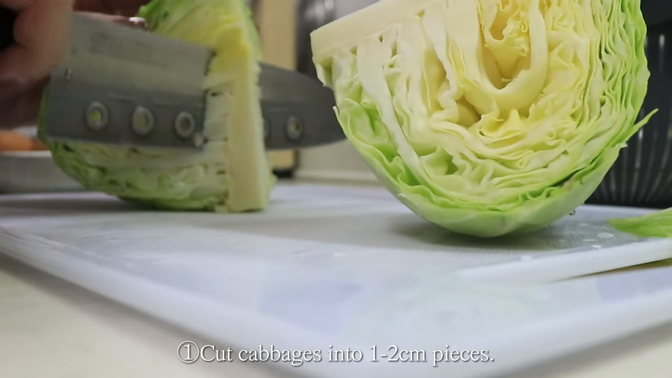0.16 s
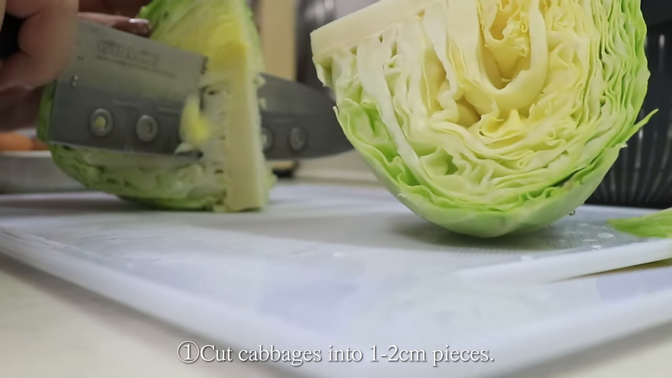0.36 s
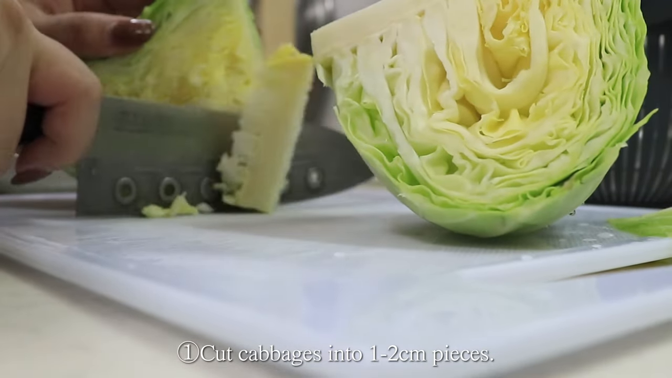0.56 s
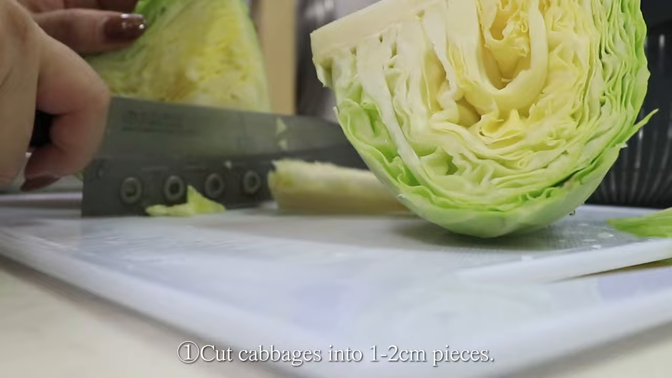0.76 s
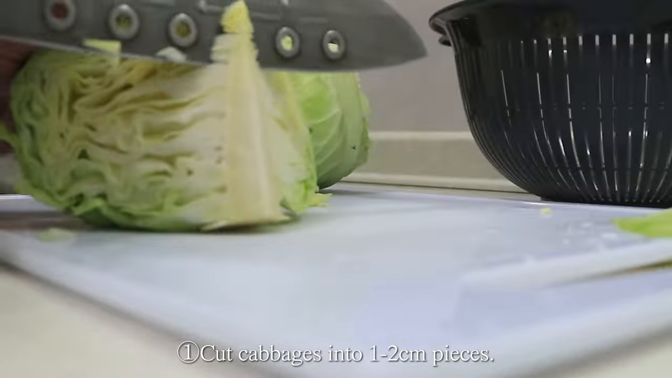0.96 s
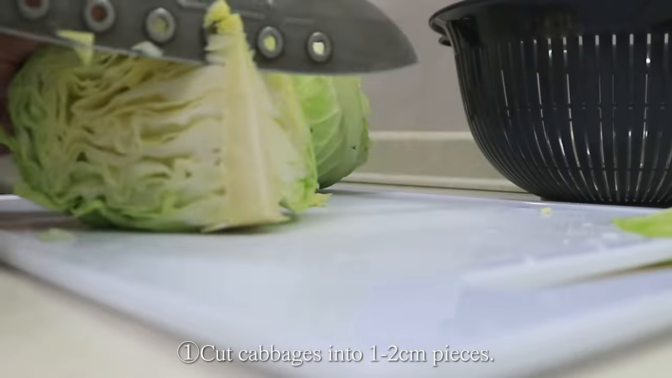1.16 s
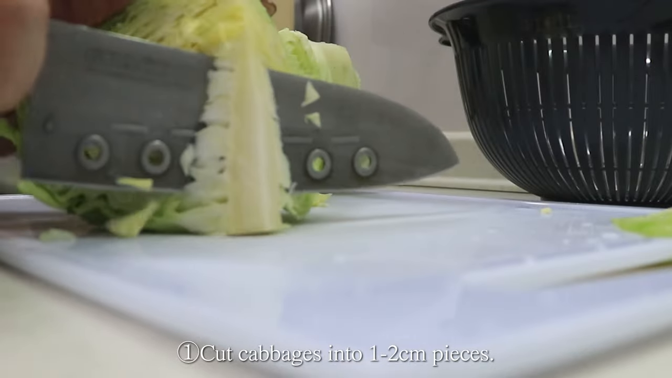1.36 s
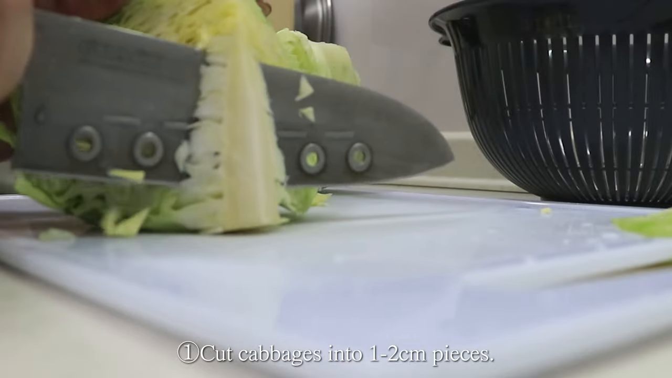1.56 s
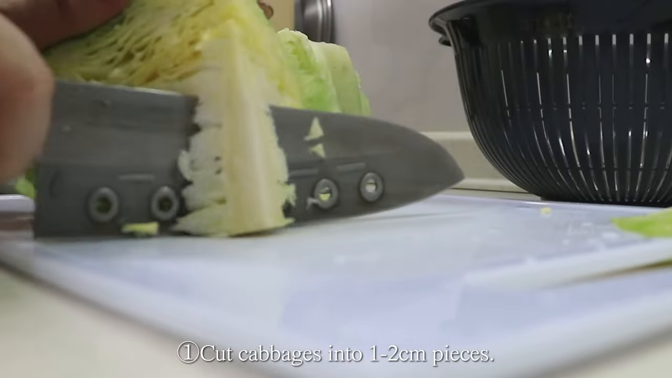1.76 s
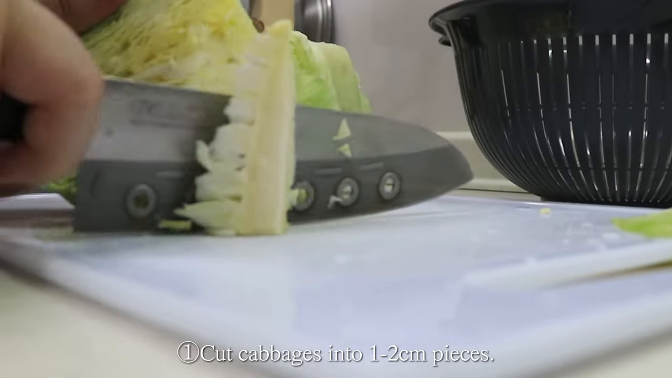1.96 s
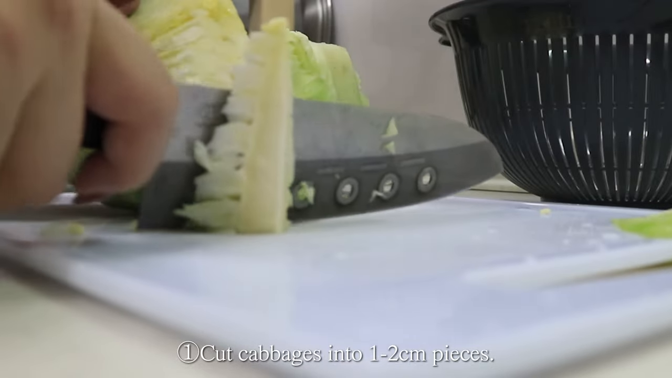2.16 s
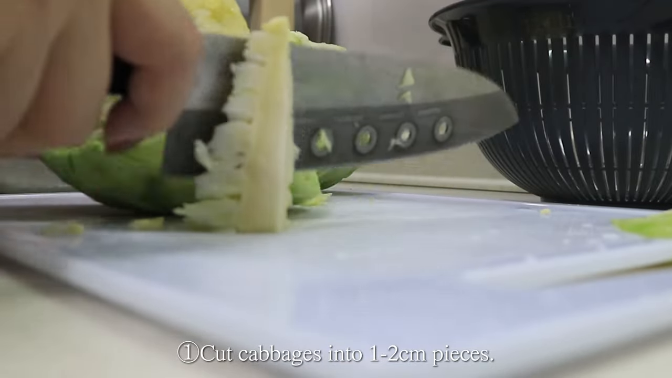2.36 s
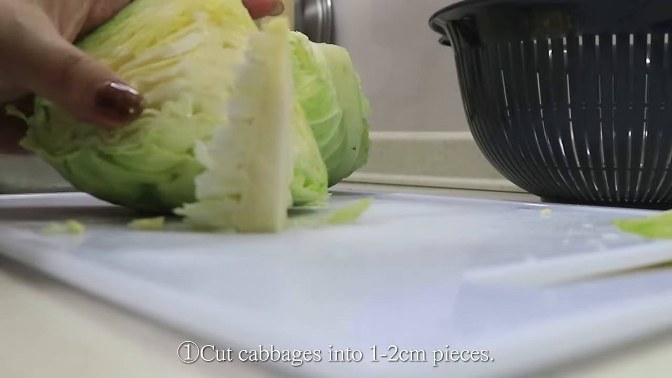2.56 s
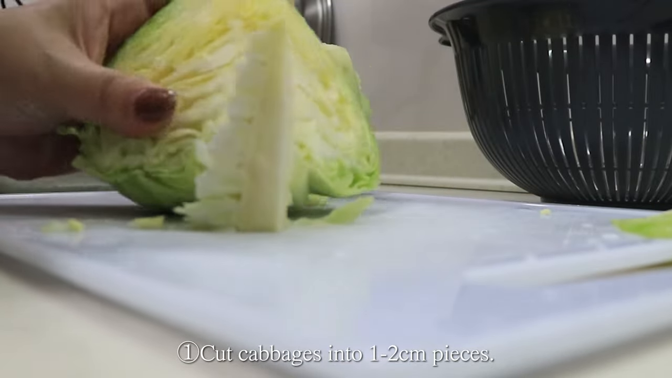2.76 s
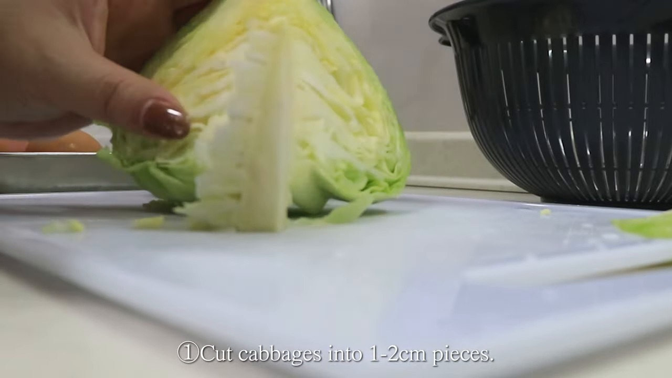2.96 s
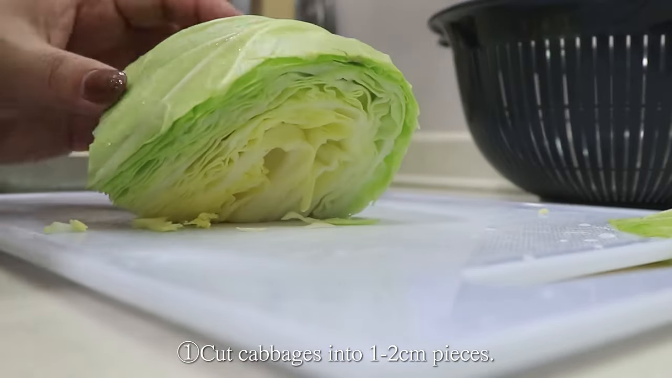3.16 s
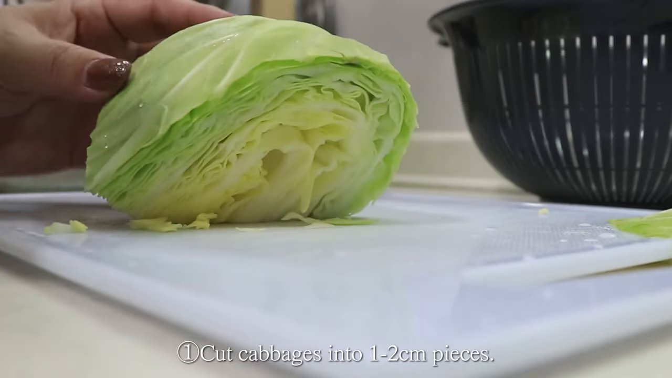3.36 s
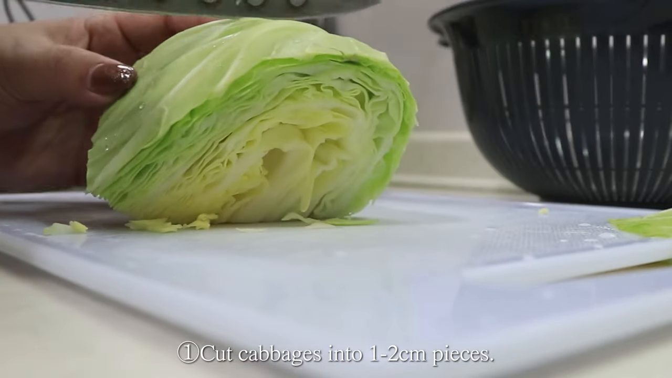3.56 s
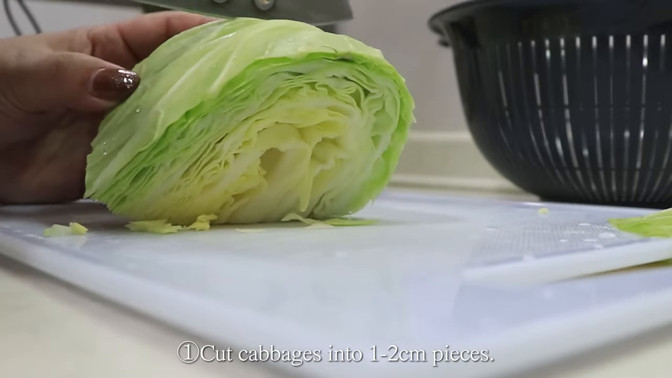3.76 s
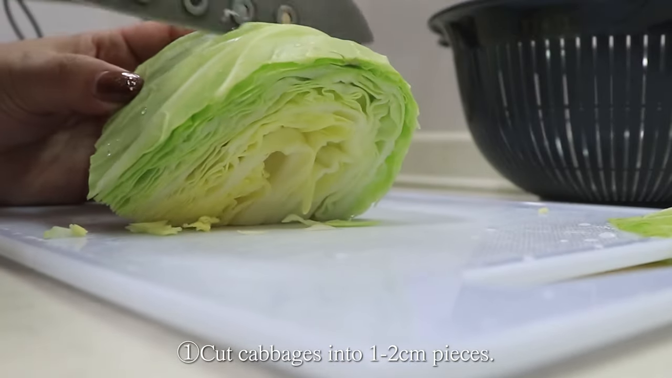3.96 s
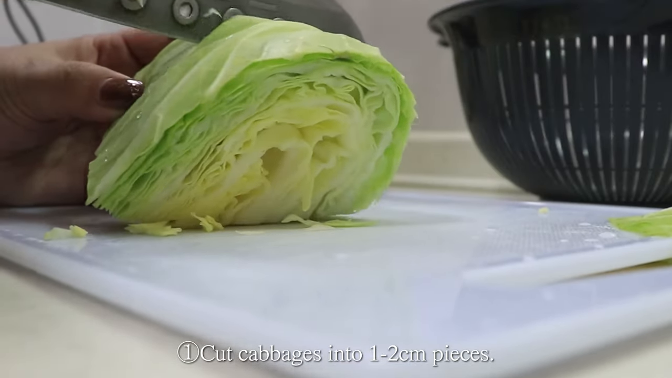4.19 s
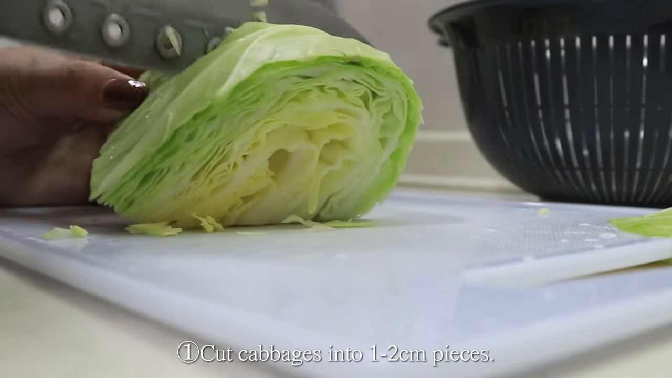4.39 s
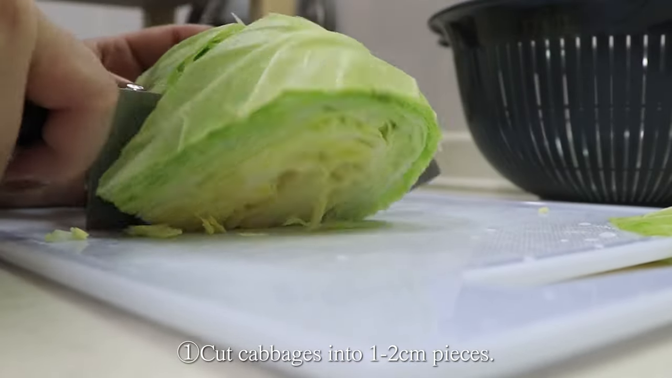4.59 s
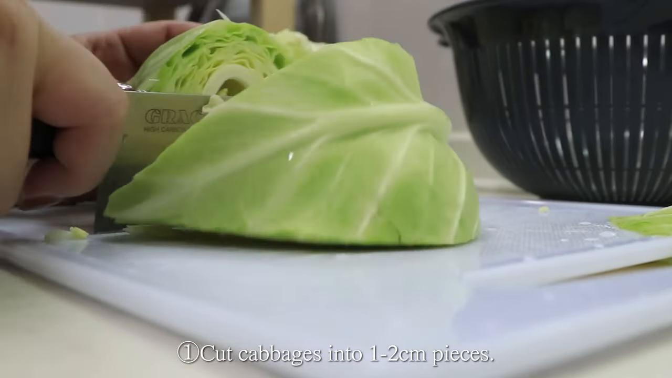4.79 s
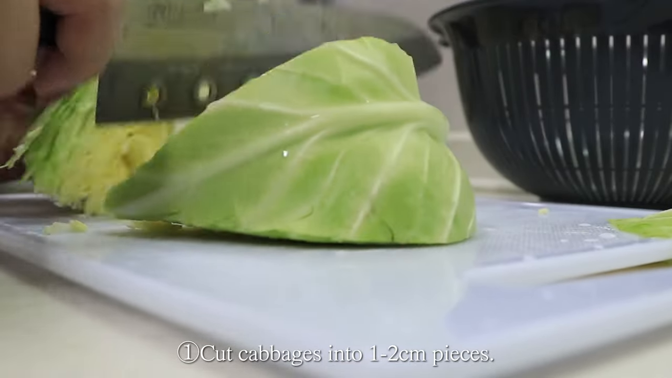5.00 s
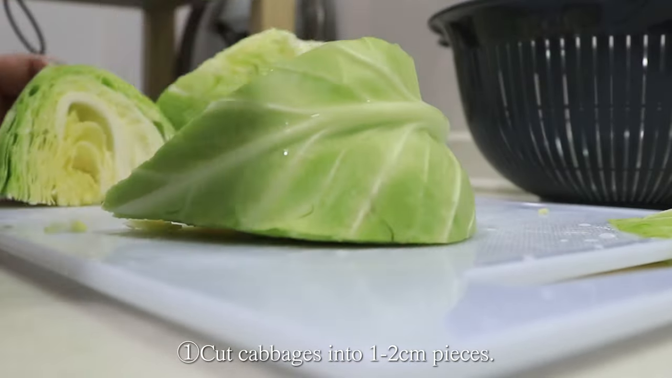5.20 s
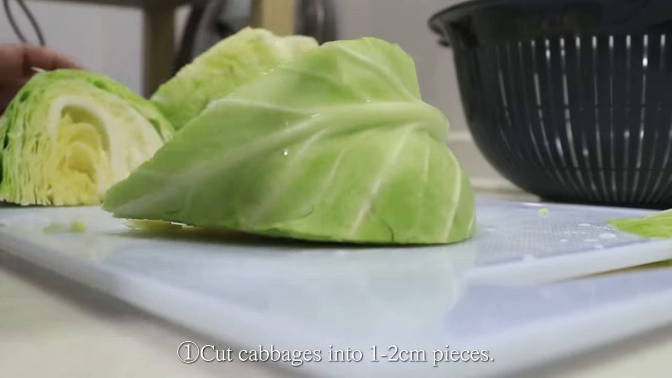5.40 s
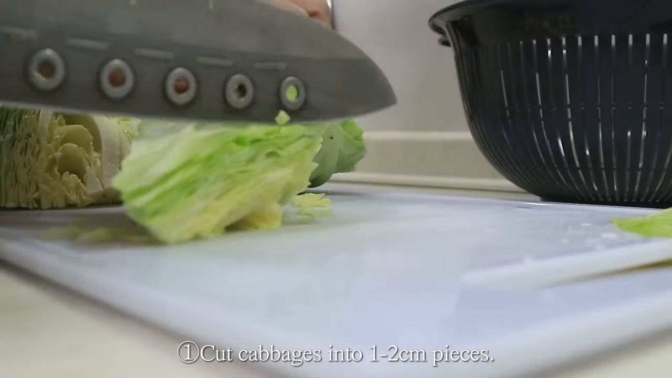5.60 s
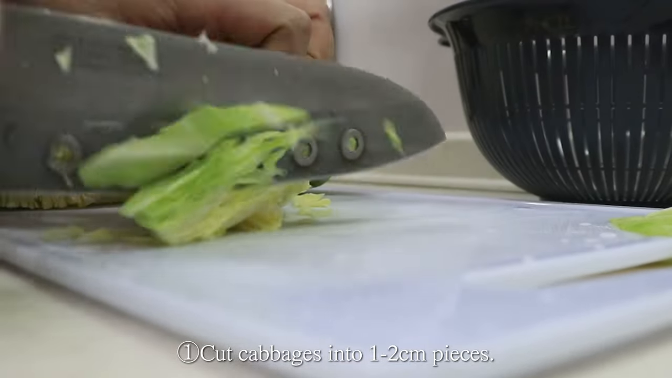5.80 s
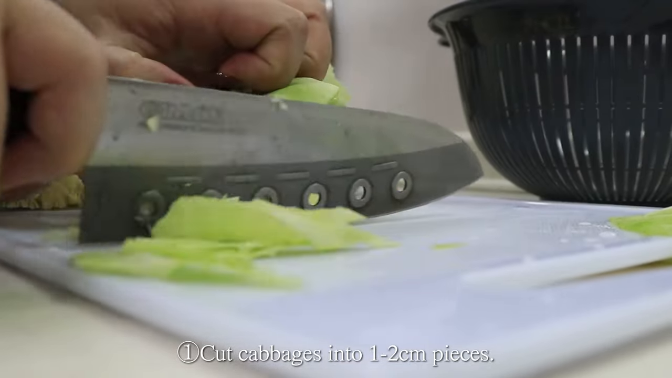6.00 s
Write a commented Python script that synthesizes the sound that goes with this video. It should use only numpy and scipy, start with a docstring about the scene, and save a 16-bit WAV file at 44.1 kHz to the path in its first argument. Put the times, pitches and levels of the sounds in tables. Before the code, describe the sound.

Close, dry sound of a knife cutting firm cabbage on a plastic board in a small kitchen, over faint low rumble and hiss. A crisp, splintering crunch at 0.1-0.3 s, scattered snaps, then a short hard crunch at 0.6 with a resonant board knock; a lighter knock at 0.83. Around 0.9-1.05 the blade pulls back through crackling leaf with bright snaps, followed by a tiny creaking judder near 1.16. Loud crunches at 1.3 and 1.8, the latter with a ringing knock. From 2 to 3.9, mostly quiet rustles, vein ticks, small snaps and soft pats. At 4.0-4.3, tentative crackles and wet squeaks; at 4.4 a big hollow crunch, squeak, and hard knock at 4.64. Leaves flop and rustle at 4.8-5.5. A last bright crunch starts at 5.76, its deeper body growing, and ends with a knock at 5.99. The loudest crunches slightly distort.

```python
"""A kitchen knife cuts cabbage on a plastic board, very close: each stroke is a swarm of leaf fractures.
Ribs snap as tuned noise bursts; the blade knocks on the board's modes, squeaks as wavering tones,
judders once in stick-slip jerks and is drawn back out through crackling leaf.
Between strokes a hand shifts rustling leaves (fractures and vein ticks) and cut pieces flop down.
Counter swings, a small room, low rumble and hiss lie around it; the loudest crunches overload."""
import sys
import numpy as np
from scipy import signal
from scipy.io import wavfile
from scipy.ndimage import uniform_filter1d

SR = 44100
rng = np.random.default_rng(int(sys.argv[2]) if len(sys.argv) > 2 else 0)


def inscribe(sig):
    """Save sig as 16-bit PCM at rate SR to the path in sys.argv[1].

    A 1-D sig is mono; a 2-D sig holds one channel per row.
    Samples are clipped to [-1, 1] before scaling.
    """
    pcm = np.round(np.clip(np.atleast_2d(sig).T, -1, 1) * 32767)
    wavfile.write(sys.argv[1], SR, pcm.astype(np.int16))


N = 266364

# Levels and spectra in dB are relative.
# cutting strokes: start_s, length_s, bite_s, crisp_db, hollow_db, head_db,
# deep_swell_db (change over the stroke, hollow and head), opening_db (crackle left as the cut opens)
STROKES = [(0.126, 0.17, 0.05, -7.5, -12.5, -17.5, -1.5, -13),
           (.579, 0.056, 0.013, -5, -10.5, -19, 3.5, -14),
           (1.313, 0.13, 0.0089, -8, -14, -20.5, -1.5, -13.5),
           (1.78, 0.047, 0.017, -1.5, -14.5, -33, 12.5, -15),
           (4, 0.13, .016, -18.5, -22.5, -35.5, 5.5, -4.5),
           (4.208, 0.047, 0.01, -26.5, -23.5, -52, -11.5, -15.5),
           (4.262, 0.018, 0.0039, -22, -12.5, -19.5, -14.5, -17.5),
           (4.401, 0.25, 0.042, -8, -11.5, -21, -11.5, -18.5),
           (5.759, 0.22, 0.038, -10, -25.5, -33.5, 17, -22.5)]
# leaves brushed by hand or blade: firmest_s, rise_s, fall_s, crisp_db, body_db, tick_share (0-1)
RUSTLES = [(0.526, .008, .05, -54.5, -56, 0.8), (.865, 0.15, 0.083, -33.5, -37, 0.7),
           (1.099, 0.3, 0.24, -43, -48, 0.46), (1.18, 0.052, 0.034, -32, -45.5, .05),
           (1.661, 0.28, .18, -47, -72, .7), (2.01, 0.16, 0.19, -30, -32, .55),
           (2.11, 0.068, 0.041, -29, -35, .55), (2.193, 0.038, 0.083, -40.5, -45.5, 0.6),
           (2.761, 0.061, 0.069, -30.5, -39, 0.82), (2.92, 0.049, 0.11, -47, -51, 0.33),
           (3.07, 0.035, .08, -53, -60, 0.67), (3.36, 0.067, 0.036, -47.5, -50, 0.6),
           (3.515, 0.024, 0.051, -27.5, -39.5, 0), (3.692, 0.018, 0.097, -37.5, -43, 0.1),
           (3.844, 0.047, 0.058, -41.5, -56.5, 0.76), (4.814, 0.019, 0.024, -18, -26, .5),
           (4.865, 0.22, 0.06, -37.5, -37, 0.5), (4.929, 0.1, .11, -28.5, -33.5, .4),
           (5.135, 0.027, 0.024, -32, -41, .3), (5.176, 0.062, 0.047, -28, -38, 0.06),
           (5.206, 0.012, 0.076, -19.5, -29.5, 0), (5.313, 0.027, 0.1, -34, -42, 0.7),
           (5.46, 0.031, 0.068, -33.5, -51, 0.6)]
# single ribs snapping: start_s, level_db, centre_hz
RIB_SNAPS = [(0.043, -23, 5700), (0.0875, -33, 5500), (0.1392, -13, 7430), (0.154, -10, 5055),
             (0.165, -4, 7160), (0.2053, -2, 7420), (0.3445, -10, 5250), (0.4015, -18, 5970),
             (0.463, -29, 6210), (0.8804, -12, 3010), (0.8992, -7, 7200), (0.9413, 1, 6270),
             (1.0096, -1, 7480), (1.0462, -15, 5930), (1.0962, -12.5, 6250), (1.3114, -12.5, 7000),
             (1.3232, 0, 7330), (1.331, -10, 6870), (1.4637, 2.5, 5950), (1.631, -20, 6700),
             (1.6456, -14.5, 5960), (1.7025, -15, 4910), (1.7533, -24.5, 5670), (1.7903, -11, 4684),
             (1.802, 3, 6980), (1.9899, -1.5, 6860), (2.0147, -2.5, 2810), (2.0648, -9, 5540),
             (2.2353, -27.5, 5050), (2.7227, -18.5, 6250), (2.7327, -16, 6610), (2.7372, -18, 5130),
             (2.7506, -8.5, 6700), (2.7543, -19, 4330), (2.7692, -9, 3110), (2.904, -18.5, 6900),
             (2.9517, -26, 2880), (3.0555, -33.5, 5080), (3.0832, -25.5, 7000), (3.2964, -29, 7100),
             (3.691, -12.5, 6510), (3.8372, -30.5, 5420), (3.987, -25.5, 7320), (4.0767, -0.5, 7150),
             (4.321, -9, 3000), (4.3844, -16.5, 2740), (4.4396, -6, 3180), (4.4614, -3, 3250),
             (4.7921, -6, 6830), (4.805, -8.5, 2720), (4.8605, -11, 7140), (4.9262, -7.5, 4970),
             (4.9964, -21.5, 4700), (5.1315, -11, 6170), (5.1746, -9, 6050), (5.2535, -15.5, 7000),
             (5.479, -23.5, 4370), (5.7765, -21, 5230), (5.8048, -12, 4920), (5.8156, -7, 5050),
             (5.8296, 0, 7430)]
# blade on board: start_s, blow_db, ring_db, ring_factor (on mode and thud t60), push_db (slow, through the counter)
KNOCKS = [(.632, -6.5, -7, 1.41, -8.5), (.829, -13, -33, .15, -50), (1.835, -7.5, -6.5, 1.57, -14.5),
          (4.642, -1.5, -12.5, 0.89, -35.5), (5.989, -1.5, -5, 0.46, -25)]
# board modes on the counter: mode_hz, level_db, t60_s (before ring_factor)
BOARD_MODES = [(106, -17, 0.4), (176, -7.5, 0.35), (187, -4, 0.41), (270, -10, 0.48), (298, -7.5, 0.36),
               (362.4, -6.5, 0.2), (434, -6.5, 0.21), (546, -9.5, 0.13), (673, -12, 0.32), (1018, -10, .18),
               (1217, -8.5, 0.24), (1415, -14, 0.16), (1650, -13, 0.21)]
# thud spectrum: band_hz, level_db
THUD = [(50, -3.5), (130, -3), (190, 1.5), (600, -2), (1700, -10.5), (2400, -11.5), (5000, -14.5),
        (8500, -13.5), (11000, -18), (16000, -14)]
# thud decay: band_hz, t60_s (before ring_factor)
THUD_DECAY = [(60, .5), (300, 0.2), (1500, 0.38), (6000, 0.27), (14000, 0.037)]
# wet leaf on blade or leaf: start_s, length_s, pitch_hz, rise_share (in mid-squeak), width_hz, level_db
SQUEAKS = [(4.027, .016, 1000, .05, 120, -23), (4.052, .035, 780, .12, 200, -27),
           (4.108, .035, 350, .03, 110, -27), (4.227, .035, 540, .05, 140, -32),
           (4.241, .025, 1950, .5, 50, -23), (4.505, .05, 1380, .08, 130, -17),
           (5.303, .02, 2000, .08, 300, -39)]
# crisp fracture spectrum: band_hz, level_db
CRISP = [(500, -54), (1500, -7.5), (2600, -15.5), (3700, -3), (5000, 3.5), (6200, 4), (7800, 5.5),
         (10000, 1), (12000, 5.5), (16000, -2)]
# packed leaf layers: band_hz, level_db
HOLLOW = [(200, -23.5), (500, -6), (780, -1.5), (1100, 0), (1550, -1), (2000, -4.5), (2750, 1.5),
          (4000, -3.5), (9000, -34.5)]
# whole head on the board: band_hz, level_db
HEAD = [(25, -16), (62, -10.5), (80, 5), (105, 0.5), (135, -6.5), (180, 2), (225, -6.5), (330, 1.5),
        (420, -3.5), (560, 6.5), (900, -15), (2500, -49.5)]
# microphone response: band_hz, gain_db
MICROPHONE = [(20, 0), (8400, 3), (9000, -0.5), (9700, -8), (16000, -13)]
# small room decay: band_hz, t60_s
ROOM_DECAY = [(100, 0.7), (1000, .32), (5000, 0.1), (9000, 0.071), (16000, 0.15)]
# rumble and hiss spectrum: band_hz, level_db
QUIET = [(12, -26), (20, 3), (70, -3.5), (90, -18), (123, -3), (158, -19), (276, -16), (309, -24),
         (336, -16.5), (376, -21), (571, -21), (799, -24), (7260, -37), (15900, -59)]
# blade drawn back out of the cut: start_s, length_s, level_db
DRAW = (0.908, 0.11, -16)
# blade with the cut face clinging to it: band_hz, level_db
BLADE = [(45, -24.5), (63, 15.5), (85, -2), (130, -7), (170, 16), (220, -5.5), (380, -3.5), (520, 8),
         (750, -4.5), (1050, -2.5), (1500, 4), (1900, -6), (2700, 1.5), (3500, -9), (5500, -2.5),
         (8000, 0.5), (16000, -1.5)]
# cabbage rocking under the hand, shaking the counter: start_s, length_s, pitch_hz, level_db
SHAKES = [(0.161, 0.05, 134.2, -27), (0.162, 0.11, 60.44, -26), (4.434, 0.14, 37.9, -20)]
# hard contact with the board: band_hz, level_db
BLOW = [(60, -19), (190, 2), (300, -2.5), (950, -2.5), (1900, -6.5), (2600, -20), (5000, -28.5),
        (16000, -39)]
# loose leaves: band_hz, level_db
PAPERY = [(60, -45.5), (200, -26.5), (600, -11), (1000, -8.5), (1500, -0.5), (2100, -1), (2900, 5.5),
          (4200, -8.5), (9000, -39)]
# cut pieces landing: start_s, level_db
FLOPS = [(.519, -39), (2.766, -38.5), (3.69, -37), (4.8, -25.5), (4.924, -39.5)]

QUIET_DB, EDGE_HZ = -55, 16000
ROOM_LOW_HZ = 130  # the room returns little below this
JUDDER_S, JUDDER_PER_S = 1.16, 183  # the blade sticks and slips as it is set on the leaves
TOUCH_DB = 23.5  # a touch swells and dies by this much in its rise and fall times
DRAW_RISE_S, DRAW_FALL_S = 0.02, 0.031
BITE_DB = 46  # the edge starts this far below full force and sinks in
STOP_DB_PER_S = 601.5  # the push ends quickly
CRACKLE_DB_PER_S = 176  # the opening cut crackles on and dies slowly
DEEP_OPENING_DB_PER_S = 229.5  # the deep layers close up sooner than the outer leaves
DEEP_LAG_S = 0.0027  # the deep layers answer after the outer leaves
SPARSE_BELOW_DB = -16.5  # under this share of full force, single veins outweigh the dense cracks


def amp(db):
    """Decibels to gain."""
    return 10 ** (np.asarray(db) / 20)


def unit(x):
    """Scales to an rms of one."""
    return x / np.sqrt(np.mean(x ** 2) + 1e-20)


def read(points, hz):
    """Reads a table on a logarithmic frequency axis."""
    points_hz, values = np.transpose(points)
    return np.interp(np.log(hz + 1), np.log(points_hz + 1), values)


def add(mix, start_s, sound):
    """Lays a sound into the mix at start_s, cut at the end."""
    part = mix[round(start_s * SR):][:len(sound)]
    part += sound[:len(part)]


def response(spectrum, size=4096):
    """The minimum-phase (causal) impulse response of a spectrum."""
    bin_hz = abs(np.fft.fftfreq(size, 1 / SR))
    log_gain = np.log(amp(read(spectrum, bin_hz)))
    return np.fft.ifft(np.exp(np.conj(signal.hilbert(log_gain)))).real[:size // 2]


def colour(x, spectrum):
    """Gives white sound a spectrum and keeps its power."""
    h = response(spectrum)
    return signal.oaconvolve(x, h / np.linalg.norm(h))[:len(x)]


def fade(x, decay, stretch=1, size=256):
    """Lets each band die away with its own t60, times stretch."""
    hz, t, z = signal.stft(x, SR, nperseg=size)
    t60_s = stretch * read(decay, hz)[:, None]
    return signal.istft(z * amp(-60 * t / t60_s), SR, nperseg=size)[1][:len(x)]


def touch(start_s, hold_s, rise_s, fall_s):
    """Gain of a contact that swells, holds and dies away."""
    t = np.arange(N) / SR - start_s
    away = np.maximum(-t, 0) / rise_s + np.maximum(t - hold_s, 0) / fall_s
    return amp(-TOUCH_DB * np.minimum(away, 10))


def push(start_s, length_s, bite_s, opening_db, opening_db_per_s, swell_db=0):
    """Gain of one stroke: the edge sinks in, pushes through and stops, and the opening cut crackles on."""
    t = np.arange(N) / SR - start_s
    after_s = np.maximum(t - length_s, 0)
    bite = -BITE_DB * np.exp(np.minimum(-t / bite_s, 2))
    swell = swell_db * (np.clip(t / length_s, 0, 1) - .5)
    ending = np.maximum(-STOP_DB_PER_S * after_s, opening_db - opening_db_per_s * after_s)
    return amp(bite + swell + ending)


def cavities(x, patch_db, hz_count=3, time_count=9, size=512):
    """Gaps between the leaves open and shut, so their resonances come and go."""
    overlap = size - size // 4
    z = signal.stft(x, SR, nperseg=size, noverlap=overlap)[2]
    patches = uniform_filter1d(rng.standard_normal(z.shape), hz_count, 0)
    patches = unit(uniform_filter1d(patches, time_count, 1))
    gain = unit(amp(patch_db * np.tanh(patches)))
    return signal.istft(z * gain, SR, nperseg=size, noverlap=overlap)[1][:len(x)]


def fractures(per_s, spread_db, clump_db, clump_s, grain_s, steady_s, count=24, size=256):
    """Cell walls burst in clumps, one clump a leaf; every burst is a tiny crack of one of count colours."""
    clumps = unit(uniform_filter1d(rng.standard_normal(N), int(clump_s * SR) or 1))
    sizes = amp(spread_db * np.minimum(rng.exponential(1, N), 4) + clump_db * clumps)
    clicks = sizes * (rng.random(N) < per_s / SR)
    kind = rng.integers(0, count, N)
    cracks = rng.standard_normal((count, size)) * np.exp(-np.arange(size) / SR / grain_s)
    x = np.zeros(N)
    for k, crack in enumerate(cracks):
        x += signal.oaconvolve(clicks * (kind == k), unit(crack))[:N]
    # a steady push releases steady energy, in few large cracks or many small ones
    span = max(int(steady_s * SR), 1)
    power = uniform_filter1d(uniform_filter1d(x ** 2, span), span)
    return x / np.sqrt(abs(power) + 1e-9)


def rumble_and_hiss():
    """Steady noise under the scene, mostly low."""
    return amp(QUIET_DB) * colour(rng.standard_normal(N), QUIET)


def kitchen(x, room_db=-19, counter_db=-15, counter_s=0.0025):
    """Quick reflections from counter, bowl and wall, then the faint tail of a small room."""
    t = np.arange(SR // 2) / SR
    late = t > .002
    near = rng.standard_normal(len(t)) * np.exp(-t / counter_s) * late
    tail = fade(rng.standard_normal(len(t)), ROOM_DECAY) * late
    echoes = amp(counter_db) * near / np.linalg.norm(near) + amp(room_db) * tail / np.linalg.norm(tail)
    highpass = signal.butter(2, ROOM_LOW_HZ, "highpass", fs=SR, output="sos")
    return x + signal.oaconvolve(x, signal.sosfilt(highpass, echoes))[:N]


def settling(level_db=-68):
    """Settling leaves tick faintly: sparse, clumped fractures."""
    ticks = fractures(per_s=180, spread_db=0.5, clump_db=7.5, clump_s=0.02, grain_s=0.00052, steady_s=0.28)
    return amp(level_db) * colour(ticks, CRISP)


def shakes():
    """A few slow swings of the counter under the weight of a stroke."""
    out = np.zeros(N)
    for start_s, length_s, pitch_hz, level_db in SHAKES:
        t = np.arange(int(length_s * SR)) / SR
        arch = np.sin(np.pi * t / length_s)
        add(out, start_s, amp(level_db) * arch * np.sin(2 * np.pi * pitch_hz * t))
    return out


def flops(decay_s=0.0075, size=4096):
    """A limp piece lands on the board with a dull pat: decaying noise."""
    out, dying = np.zeros(N), np.exp(-np.arange(size) / SR / decay_s)
    for start_s, level_db in FLOPS:
        noise = rng.standard_normal(size)
        add(out, start_s, amp(level_db) * colour(noise * dying, BLOW))
    return out


def rustling(ticks_per_s=170):
    """Loose leaves rub and crackle under hand or blade, and their thin veins tick one by one."""
    cracks = fractures(per_s=2500, spread_db=0, clump_db=6, clump_s=0.014, grain_s=0.00017, steady_s=0.011)
    ticks = fractures(ticks_per_s, spread_db=2.5, clump_db=0, clump_s=.01, grain_s=.0005, steady_s=.06)
    crisp, body = np.zeros((2, N))
    for firmest_s, rise_s, fall_s, crisp_db, body_db, tick_share in RUSTLES:
        leaves = np.sqrt(1 - tick_share) * cracks + np.sqrt(tick_share) * ticks
        leaves *= touch(firmest_s, 0, rise_s, fall_s)
        crisp += amp(crisp_db) * leaves
        body += amp(body_db) * leaves
    return colour(crisp, CRISP) + cavities(colour(body, PAPERY), patch_db=4.5)


def squeaks(size=4096):
    """Wet leaf sliding on blade or leaf: a narrow, unsteady tone that rises and falls."""
    out = np.zeros(N)
    for start_s, length_s, pitch_hz, rise_share, width_hz, level_db in SQUEAKS:
        arch = np.sin(np.linspace(0, np.pi, int(length_s * SR)))
        noise = rng.standard_normal(2 * size) + 1j * rng.standard_normal(2 * size)
        pole = np.exp(-np.pi * width_hz / SR)
        waver = signal.lfilter([1], [1, -pole], noise)[-len(arch):]
        phase = 2 * np.pi * np.cumsum(pitch_hz * (1 + rise_share * arch)) / SR
        tone = (waver * np.exp(1j * phase)).real
        add(out, start_s, amp(level_db) * unit(tone * arch))
    return out


def withdrawal():
    """Wet leaf edges flick past the rising blade, which rings with them."""
    flicks = fractures(per_s=3900, spread_db=1, clump_db=4.5, clump_s=0.0043, grain_s=0.00013, steady_s=0.013)
    start_s, length_s, level_db = DRAW
    contact = touch(start_s, length_s, DRAW_RISE_S, DRAW_FALL_S)
    return amp(level_db) * colour(flicks * contact, BLADE)


def judder(level_db=-12.0, slip_s=0.0012, body_db=-7, shared_share=0.41, count=9, size=2048):
    """A short run of stick-slip jerks, alike but never the same: the cabbage creaks under the blade."""
    out, shared = np.zeros(N), rng.standard_normal(size)
    dying = np.exp(-np.arange(size) / SR / slip_s)
    for k, force in enumerate(np.sqrt(np.hanning(count + 6)[3:-3])):
        burst = (shared_share * shared + (1 - shared_share) * rng.standard_normal(size)) * dying
        slip = colour(burst, BLADE) + amp(body_db) * (colour(burst, PAPERY) + colour(burst, HEAD))
        add(out, JUDDER_S + k / JUDDER_PER_S, amp(level_db) * force * slip / abs(slip).max())
    return out


def knocks(modes_db=-8, thud_db=-2, blow_s=0.0044, push_s=0.021):
    """The edge lands: a hard blow, the board's modes, a gritty dying thud, a slow push through the counter."""
    out, t = np.zeros(N), np.arange(SR) / SR
    grit = fractures(per_s=4600, spread_db=1.1, clump_db=2, clump_s=0.0054, grain_s=0.00018, steady_s=.015)
    counter = (t / push_s) ** 2 * np.exp(-t / push_s)
    counter /= counter.max()
    for k, (start_s, blow_db, ring_db, ring_factor, push_db) in enumerate(KNOCKS):
        blow = colour(rng.standard_normal(SR), BLOW) * np.exp(-t / blow_s)
        blow *= np.sqrt(blow_s * SR / 2) / np.linalg.norm(blow)
        modes = np.zeros(SR)
        for m, (mode_hz, level_db, t60_s) in enumerate(BOARD_MODES):
            dying = amp(level_db - 60 * t / (t60_s * ring_factor))
            modes += (-1) ** m * dying * np.sin(2 * np.pi * mode_hz * t)  # alternating polarity
        thud = colour(fade(grit[k * SR:][:SR], THUD_DECAY, ring_factor), THUD)
        ring = amp(modes_db) * modes + amp(thud_db) * thud
        add(out, start_s, amp(blow_db) * blow + amp(ring_db) * ring + amp(push_db) * counter)
    return out


def snaps(octaves=0.52, skirt=0.069, crest_db=9.0, decay_s=0.0018, tip_db=-4, tip_s=0.00034,
          leaf_db=-12, leaf_s=0.0018, size=2048):
    """A rib gives way: a bright first crack, a burst tuned by the size of the piece, a flick of its leaf."""
    out, t, hz = np.zeros(N), np.arange(size) / SR, np.geomspace(100, 16000, 16)
    dying = np.exp(-t / decay_s)
    for start_s, level_db, centre_hz in RIB_SNAPS:
        noise, crack = rng.standard_normal((2, size))
        bell = np.exp(-.5 * (np.log2(hz / centre_hz) / octaves) ** 2)
        burst = colour(noise * dying, np.c_[hz, 20 * np.log10(skirt + bell)])
        burst *= np.linalg.norm(dying) / np.linalg.norm(burst)
        tip = amp(tip_db) * np.diff(crack, prepend=0) * np.exp(-t / tip_s)
        leaf = amp(leaf_db) * colour(crack * np.exp(-t / leaf_s), PAPERY)
        add(out, start_s, amp(level_db - crest_db) * (tip + leaf + burst))
    return out


def cutting():
    """Fractures along the edge sound directly, through the leaf layers, and through the head into the board."""
    cracks = fractures(per_s=2600, spread_db=1.5, clump_db=3, clump_s=0.0017, grain_s=0.00032, steady_s=0.06)
    veins = fractures(per_s=320, spread_db=2, clump_db=4.5, clump_s=.01, grain_s=0.00031, steady_s=.025)
    crisp, hollow, head = np.zeros((3, N))
    for start_s, length_s, bite_s, crisp_db, hollow_db, head_db, swell_db, opening_db in STROKES:
        force = push(start_s, length_s, bite_s, opening_db, CRACKLE_DB_PER_S)
        deep = push(start_s + DEEP_LAG_S, length_s, bite_s, opening_db, DEEP_OPENING_DB_PER_S, swell_db)
        dense = force / (force + amp(SPARSE_BELOW_DB))
        crisp += amp(crisp_db) * force * (np.sqrt(dense) * cracks + np.sqrt(1 - dense) * veins)
        hollow += amp(hollow_db) * deep * cracks
        head += amp(head_db) * deep * cracks
    layers = colour(hollow, HOLLOW) + colour(head, HEAD)
    return colour(crisp, CRISP) + cavities(layers, patch_db=4.0)


def scene():
    """Knife, cabbage and board in the kitchen, with faint ticks of settling leaves."""
    leaves = cutting() + rustling() + snaps() + flops() + settling()
    blade = withdrawal() + squeaks() + judder()
    return kitchen(leaves + blade + knocks() + shakes())[None]


def record(dry, ceiling=0.91, knee=5):
    """The microphone dulls the top octave; rumble and hiss join; peaks overload; then the band limit."""
    x = signal.oaconvolve(dry[0], response(MICROPHONE))[:N] + rumble_and_hiss()
    x = x / (1 + abs(x / ceiling) ** knee) ** (1 / knee)
    lowpass = signal.firwin(511, EDGE_HZ, window=("kaiser", 8), fs=SR)
    return signal.oaconvolve(x, lowpass, "same")[None]


dry = scene()
out = record(dry)
inscribe(out)
```